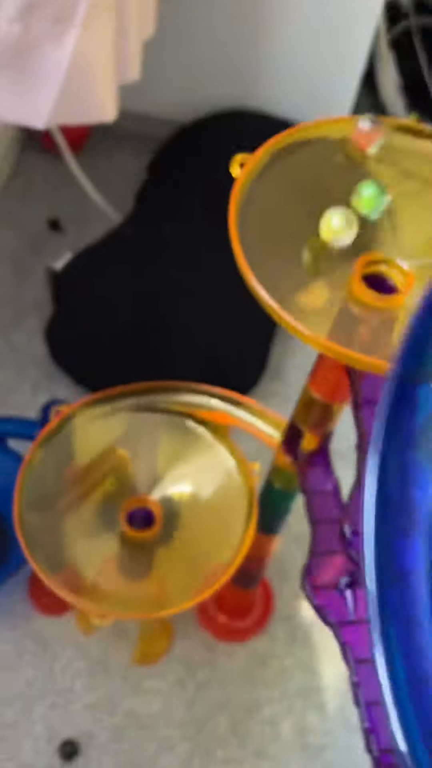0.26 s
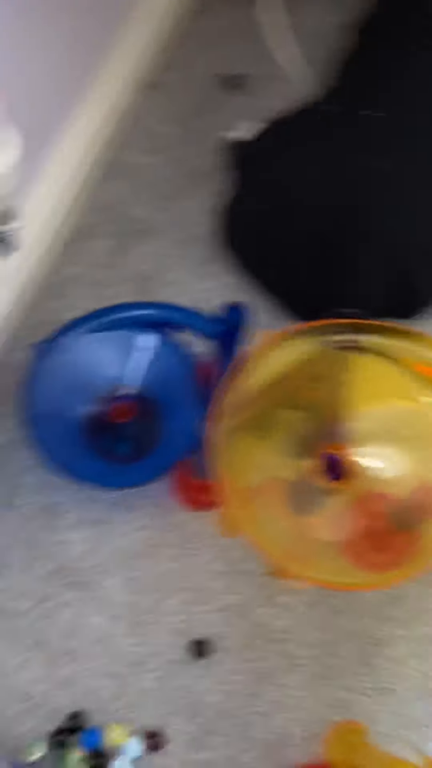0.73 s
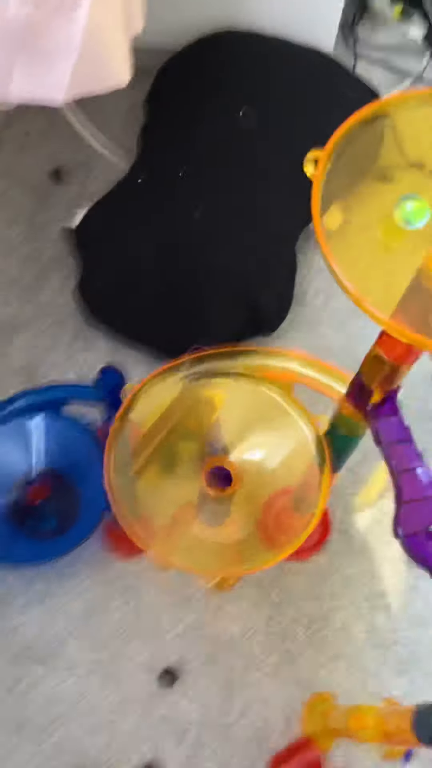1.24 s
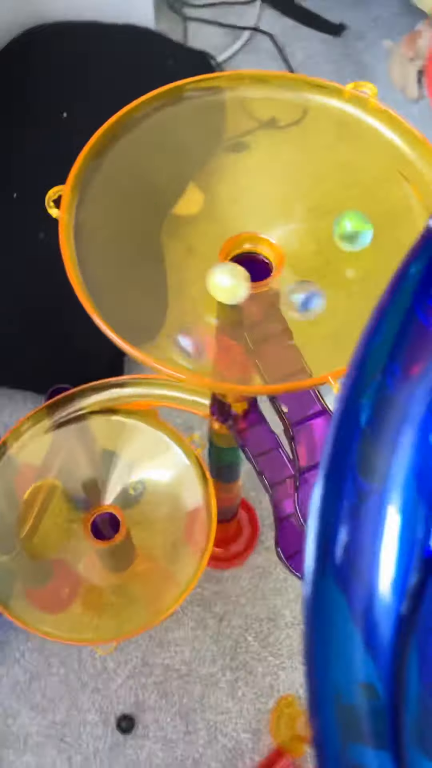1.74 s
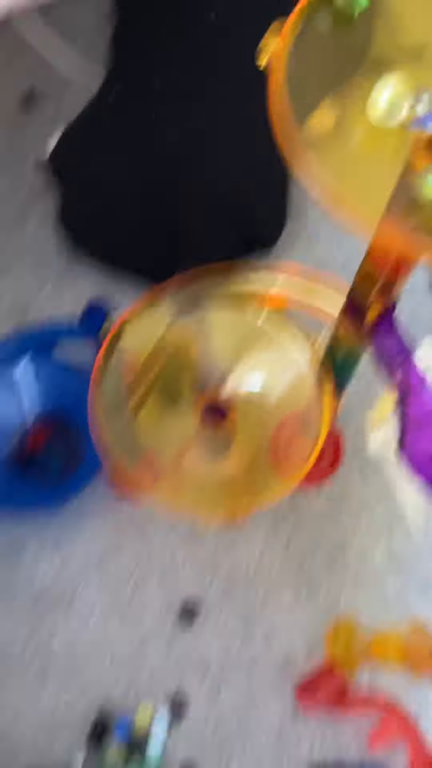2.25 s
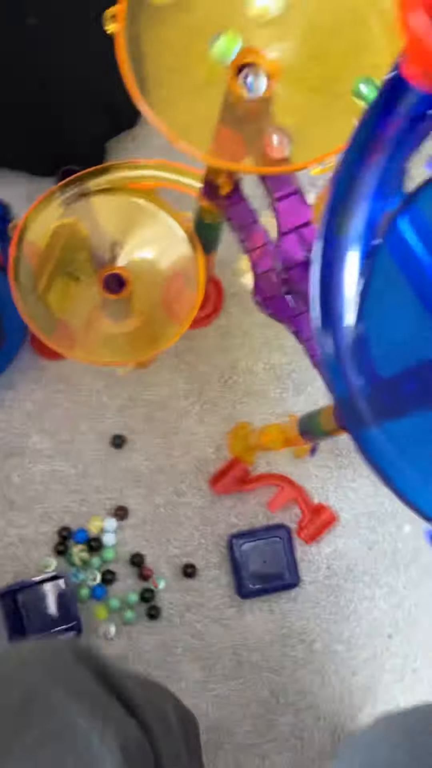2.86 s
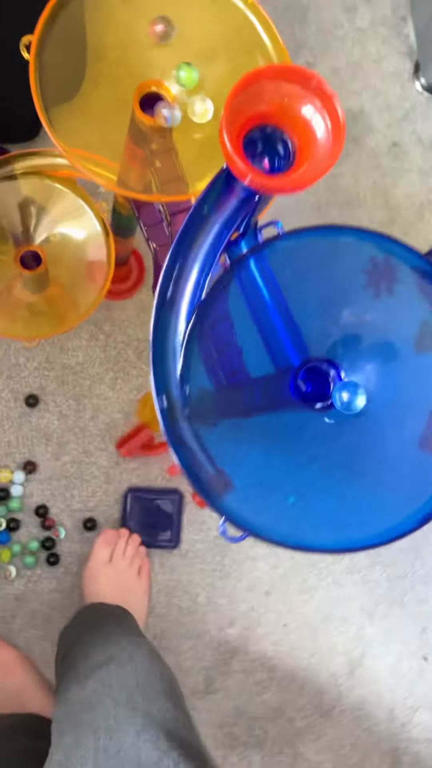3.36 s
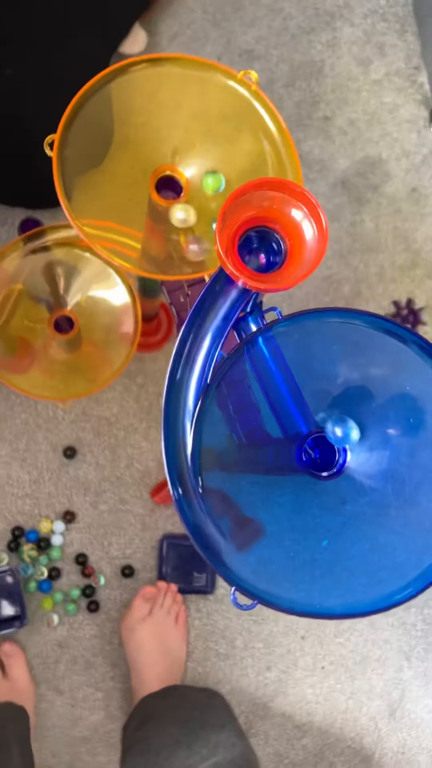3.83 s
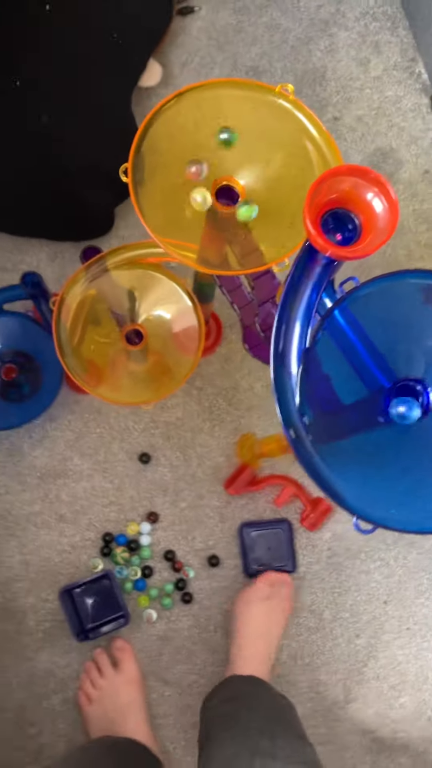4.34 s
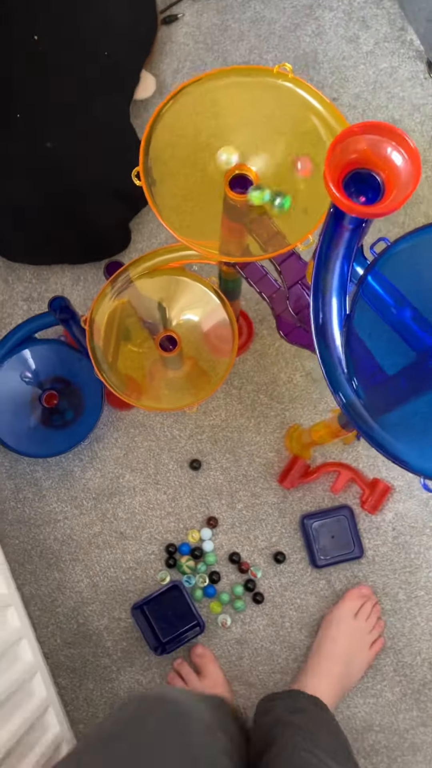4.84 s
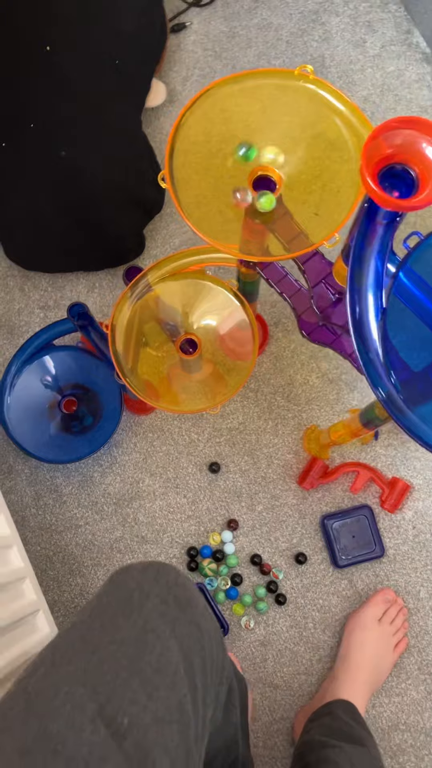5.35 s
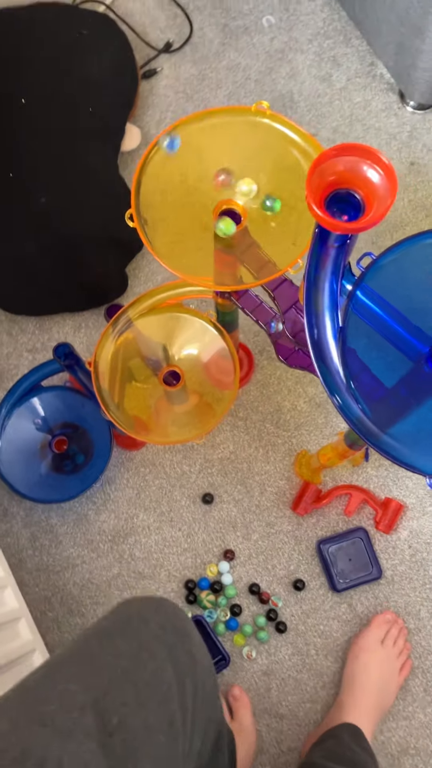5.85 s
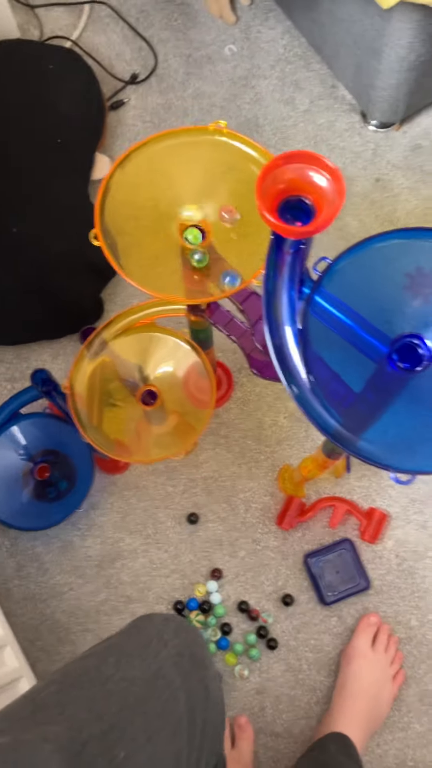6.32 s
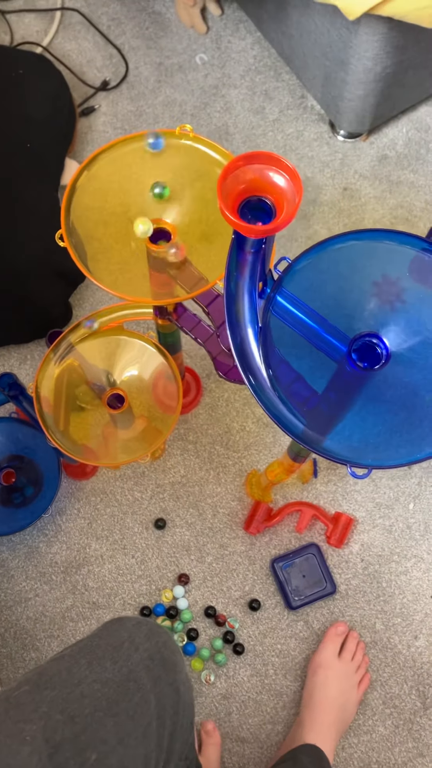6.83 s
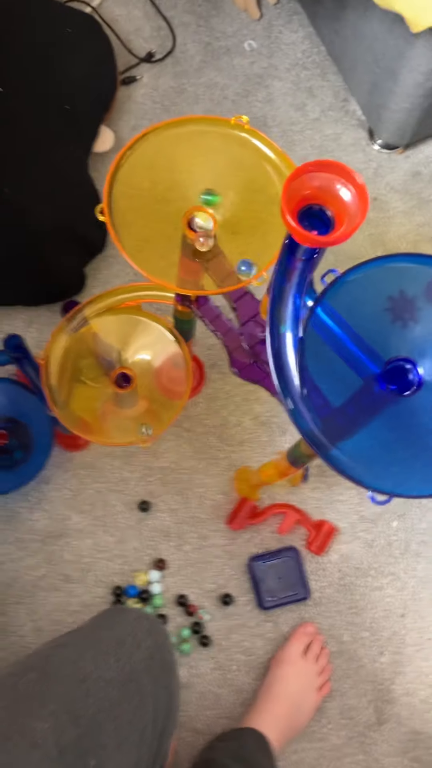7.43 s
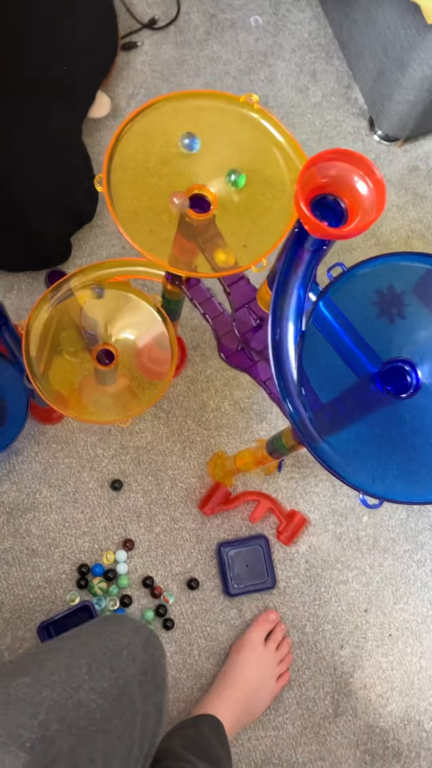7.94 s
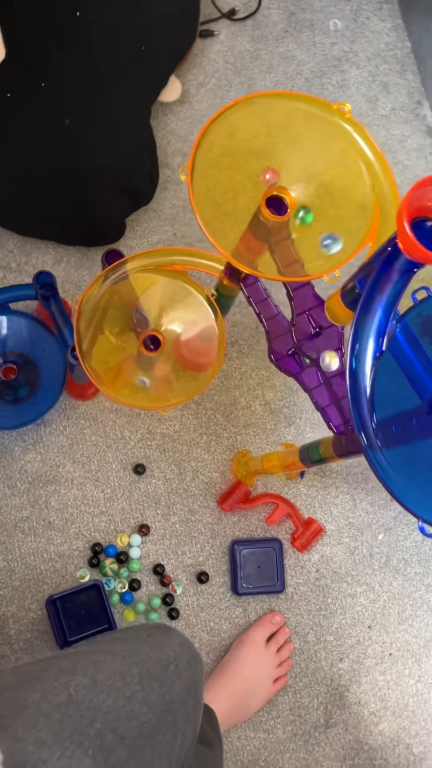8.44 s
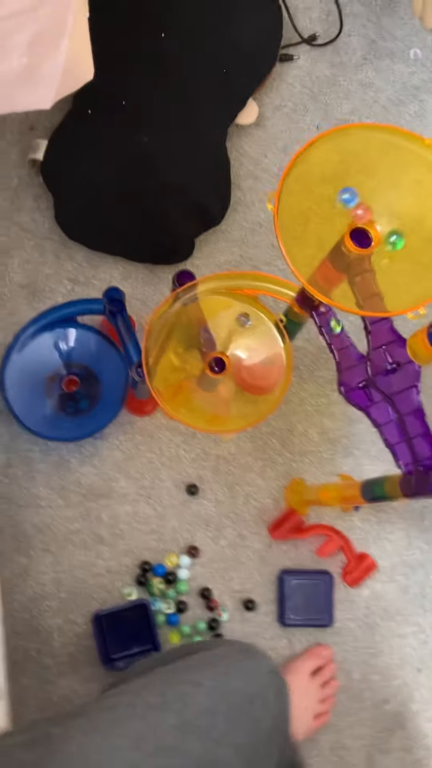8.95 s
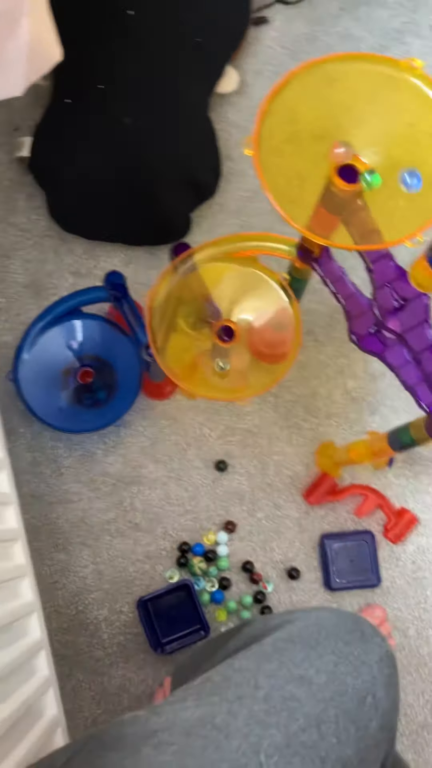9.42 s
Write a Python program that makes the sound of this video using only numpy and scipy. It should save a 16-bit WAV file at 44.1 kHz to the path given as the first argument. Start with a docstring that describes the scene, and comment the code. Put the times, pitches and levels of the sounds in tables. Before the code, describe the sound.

Glass marbles roll and swirl in plastic funnels, then tumble down a plastic run in dense, bright clacking volleys in a small carpeted room.

```python
"""Glass marbles roll and knock in plastic funnels in a small carpeted room; blows ring track modes and crack.
Rolling grit drives the funnel resonances throughout, soft low thumps come now and then, and chutes rattle.
From 3.3 to 5 s a hand-held phone turns to the whole marble run: blows gain weight and edge, the boom fades.
Then marbles drop down the steps in dense volleys of knocks until the end, heard by two microphone ports."""
import sys
import numpy as np
from scipy import signal
from scipy.fft import rfft, irfft
from scipy.io import wavfile
from scipy.ndimage import uniform_filter1d

SR = 44100
rng = np.random.default_rng(int(sys.argv[2]) if len(sys.argv) > 2 else 0)


def generate_wav(sig):
    """Save sig (samples, or channels by samples) to the path in sys.argv[1] as 16-bit PCM at SR."""
    pcm = np.round(np.clip(np.atleast_2d(sig).T, -1, 1) * 32767).astype(np.int16)
    wavfile.write(sys.argv[1], SR, pcm)


def volts(x):
    """Linear amplitude factor 10**(x/20) for a level x in dB, scalar or array-like."""
    e = np.asarray(x, float) / 20
    return 10 ** e


N = 426888  # samples

# Modes of the plastic track. Each row: pitch in Hz, relative level in dB, longest 60 dB decay in seconds.
TRACK = [(253, -21, 0.024), (479, -9, 0.11), (639, -3, 0.053), (822, 1, 0.081), (927, -2.5, 0.095),
         (1075, -6.5, 0.038), (1360, 5, 0.098), (1500, 3.5, 0.037), (1640, 14, 0.012), (1735, 15.5, 0.018),
         (2240, 6.5, 0.021), (2577, 7, 0.022), (2938, 5, 0.029), (3216, 5.5, 0.037), (3810, 4, 0.012),
         (4180, 1.5, 0.024), (4840, 6, 0.0072)]
# Colour of glass on plastic, crack and hiss. Each row: frequency in Hz, relative level in dB.
GLASS = [(300, -25), (2000, -6), (4500, -3), (6000, 5), (8000, 4.5), (11500, 1.5), (15500, -4.5),
         (16500, -59)]
LOW_HZ = 1200  # modes below this are the dry body of the run
UPPER_HZ = 2050  # modes above this follow the brightness of the blow
MODE_HZ = np.array(TRACK)[:, 0]
MAIN_MODES, UPPER_MODES = MODE_HZ < UPPER_HZ, MODE_HZ > UPPER_HZ
KNOCK_LENGTH = 3072  # samples


def colour(x, points):
    """Causal filter through (Hz, dB) points, built from the cepstrum of the log gain."""
    hz, db = np.transpose(points)
    log_hz = np.log(np.fft.rfftfreq(4096, 1 / SR) + 1)
    log_gain = np.interp(log_hz, np.log(hz), db) * np.log(10) / 20
    cepstrum = irfft(log_gain)
    # folding the cepstrum forward makes the filter minimum phase
    cepstrum[1:2048] *= 2
    cepstrum[2049:] = 0
    impulse = irfft(np.exp(rfft(cepstrum)))
    return signal.fftconvolve(x, impulse[None], axes=-1)[:, :x.shape[-1]]


def unit(x):
    """Scale to rms 1."""
    return x / np.sqrt(np.mean(x ** 2))


def walk(rate):
    """Random levels held 1 / rate s and slewed twice; spread near 1."""
    hold = int(SR / rate)
    steps = np.repeat(rng.standard_normal(N // hold + 1), hold)
    return 1.3 * uniform_filter1d(uniform_filter1d(steps, hold), hold)[:N]


def ports(unlike):
    """Noise at both ports, partly shared."""
    shared, own = rng.standard_normal((2, N))
    return shared + unlike * own * np.array([[1], [-1]])


def add(out, s, sound):
    """Mix a two-channel sound in at s seconds."""
    i = int(s * SR)
    n = min(sound.shape[1], N - i)
    out[:, i:i + n] += sound[:, :n]


def turned(s):
    """0 while the phone faces the funnels, 1 once it faces the whole run."""
    return np.interp(s, [3.3, 5], [0, 1])


def knocks(ring_db, rattle_db):
    """The clear blows, light bounces that grow with the rolling, and marbles meeting each other."""
    # Blows on the track. Each row: start in seconds, peak of the main rings in dB,
    # loudest ring in Hz, brightness in dB.
    blows = [(0.389, -21, 1420, -43), (0.4687, -23, 1360, -51), (0.684, -22, 1500, -40),
             (0.9633, -7.5, 1666, -14.5), (1.009, -7.5, 1420, -18.5), (1.047, -9, 1530, -18),
             (1.076, -21, 1640, -70), (1.4055, -15.5, 4840, -13.5), (1.4179, -18, 1660, -25),
             (1.432, -24, 4160, -19.5), (1.4478, -19, 3025, -9), (1.509, -14, 3100, -12.5),
             (1.558, -22, 1360, -55), (1.605, -19, 1360, -47), (1.824, -23.5, 1655, -33),
             (1.918, -21, 1500, -52), (3.1855, -23.5, 1420, -63), (3.505, -17, 1420, -28),
             (3.577, -3.5, 1405, -19), (3.662, -6, 1285, -20), (3.7266, -7.5, 1310, -24.5),
             (3.776, -11.5, 1670, -19), (3.808, -17, 1700, -28), (3.8497, -9, 1880, -25.5),
             (3.8765, -18, 1410, -29.5), (3.931, -10, 1850, -21), (4.0075, -12.5, 1896, -21),
             (4.0662, -11.5, 1735, -20.5), (4.086, -14.5, 1810, -34), (4.116, -10.5, 1296, -20),
             (4.2687, -17.5, 1300, -81), (4.3302, -22, 1790, -28), (4.4391, -7.5, 1750, -21),
             (4.5251, -11.5, 1550, -21.5), (4.6042, -10.5, 1380, -30), (4.677, -4.5, 1695, -17.5),
             (4.7115, -5, 1500, -25), (4.75, -7, 1664, -33), (4.776, -2, 1643, -17.5),
             (4.8704, -5, 1750, -22), (4.9462, -5.5, 1870, -24), (4.9786, -9, 1634, -30),
             (5.022, -12, 1670, -30), (5.052, -13, 1540, -22), (5.0685, -15, 1610, -36),
             (5.0872, -18, 1740, -44), (5.1138, -9.5, 1647, -14), (5.128, -22, 1750, -35),
             (5.1527, -16, 1704, -33), (5.222, -12, 1920, -27), (5.251, -19, 1610, -33),
             (5.3221, -13.5, 1600, -27), (5.4142, -10.5, 1672, -24), (5.4886, -18, 1780, -25.5),
             (5.538, -20.5, 1240, -27.5), (5.66, -18.5, 1294, -23.5), (5.8056, -14.5, 1630, -24.5),
             (5.9243, -15.5, 1900, -24.5), (6.0256, -11.5, 1290, -25), (6.122, -19, 1340, -18.5),
             (6.1913, -15, 1280, -28), (6.203, -15, 1360, -27), (6.221, -14, 1360, -20.5),
             (6.2778, -13, 1340, -17), (6.368, -19, 2250, -26.5), (6.7372, -13.5, 1450, -20.5),
             (6.767, -6.5, 1402, -18), (6.812, -7, 1460, -22), (6.8703, -10.5, 1420, -27.5),
             (6.911, -14, 1440, -31), (6.9408, -15, 1434, -24.5), (7.017, -6, 1750, -36),
             (7.045, -18.5, 1360, -32.5), (7.1057, -12.5, 1250, -25.5), (7.1857, -15, 1500, -21.5),
             (7.2448, -16.5, 1695, -26), (7.2654, -18, 1370, -29), (7.295, -18, 1660, -25),
             (7.3132, -16.5, 1700, -35), (7.436, -16, 1655, -25), (7.5505, -8.5, 1690, -21),
             (7.5626, -3, 1640, -19.5), (7.598, -13, 1640, -29), (7.647, -9.5, 1930, -24),
             (7.683, -12.5, 1720, -32), (7.7127, -16.5, 1750, -36), (7.738, -8, 1750, -26),
             (7.816, -9, 1662, -21), (7.874, -5, 1815, -21), (7.9105, -0.5, 1653, -16),
             (7.931, -12, 1670, -29), (7.96, -11.5, 1590, -24), (7.986, -12.5, 1750, -34),
             (8.025, -14, 1800, -46), (8.037, -13.5, 1940, -23), (8.056, -17, 1750, -28),
             (8.0958, -16, 1730, -24.5), (8.113, -11, 1648, -20.5), (8.1426, -14.5, 1310, -24),
             (8.164, -16.5, 1720, -28), (8.2017, -15, 1573, -25.5), (8.2916, -10.5, 1705, -21),
             (8.359, -20, 1820, -24.5), (8.4138, -21, 1850, -28), (8.4351, -11, 1860, -21),
             (8.564, -16.5, 1650, -21.5), (8.6032, -23, 2500, -27.5), (8.6576, -15, 1230, -25),
             (8.7377, -6.5, 1770, -15.5), (8.7962, -18, 1600, -20), (8.8383, -2, 2020, -16.5),
             (8.8568, -8.5, 1830, -22), (8.9174, -14, 1654, -31), (8.9505, -12.5, 1910, -26.5),
             (8.9881, -13.5, 1750, -37), (9.0449, -15.5, 1880, -19), (9.06, -12.5, 1540, -33),
             (9.1086, -14, 1600, -24), (9.1479, -7, 1900, -13), (9.207, -13, 1750, -23),
             (9.2515, -15.5, 1600, -18), (9.326, -21, 1800, -25), (9.3818, -21.5, 1850, -28)]
    # Marbles clicking together. Each row: start in seconds, peak in dB.
    clicks = [(0.019, -26), (0.598, -14.5), (0.6827, -20.5), (0.7237, -27.5), (0.892, -23), (0.945, -14),
              (1.495, -10), (1.9963, -26), (2.194, -16.5), (2.581, -15.5), (3.39, -21.5), (5.83, -23),
              (6.051, -22), (6.247, -26), (6.793, -14), (7.461, -22), (8.974, -27), (9.0907, -25),
              (9.352, -15.5), (9.398, -28), (9.5482, -17), (9.665, -20.5)]
    out = np.zeros((2, N))
    for s, peak_db, ring_hz, bright_db in blows:
        # the treble crack follows the strength and brightness of the blow, with some scatter
        crack_db = 3 + 0.39 * peak_db + 0.52 * bright_db + 3.5 * rng.standard_normal()
        add(out, s, knock(s, peak_db, ring_hz, bright_db + 8, crack_db))
    for s, peak_db in clicks:
        add(out, s, volts(peak_db) * crack(rng.standard_normal((3, KNOCK_LENGTH))))
    for place, weight, pitch, bright in rng.random((70, 4)):
        i = int(place * N)
        peak_db = ring_db[i] + 5 + 7 * weight
        upper_db = rattle_db[i] + 11 + 8 * weight
        crack_db = rattle_db[i] + 3.5 + 12 * bright
        add(out, i / SR, knock(i / SR, peak_db, 1300 + 600 * pitch, upper_db, crack_db))
    return out


def knock(s, peak_db, ring_hz, upper_db, crack_db):
    """One blow: the modes nearest the struck step's own pitch ring loudest."""
    t = np.arange(KNOCK_LENGTH) / SR
    spot, side, tune = rng.standard_normal((3, len(MODE_HZ)))
    grit = rng.standard_normal((3, KNOCK_LENGTH))
    funnel_side = 1 - turned(s)
    near_db = np.where(MODE_HZ > UPPER_HZ, 16, 10) * np.exp(-(np.log(MODE_HZ / ring_hz) / 0.06) ** 2)
    thud_db = (MODE_HZ < LOW_HZ / 2) * funnel_side * -9
    mode_db = near_db + thud_db + 2.1 * spot
    gain_db = (mode_db[:, None] + np.outer(side, [1.6, -1.6]))[:, :, None]  # mode, port, time
    # the marble chatters on the plastic, so a sharp first contact is followed by a ragged burst and a weak drag
    contact = (np.exp(-t / 0.0031) + 0.11 * np.exp(-t / 0.026)) * (1 - np.exp(-t / 0.00076))
    push = (grit[0] + 0.41 * grit[1:]) * contact
    push[:, 8] += 14
    # the marble lands again, weaker, about 17 ms later
    rebound = int(0.017 * SR * volts(3 * grit[1, -1]))
    push = push + 0.15 * np.roll(push, rebound, axis=1)
    main = ring(push, MAIN_MODES, gain_db[MAIN_MODES], 0.017 * tune[MAIN_MODES])
    upper = ring(push, UPPER_MODES, gain_db[UPPER_MODES], 0.017 * tune[UPPER_MODES])
    return (volts(peak_db) * main / np.abs(main).max()
            + volts(upper_db) * upper / np.abs(upper).max()
            + volts(crack_db - 3 * funnel_side) * crack(grit))


def ring(push, part, gain_db, detune):
    """The chosen track modes driven by a force; a small plastic part radiates no deep bass."""
    out = 0
    # neighbouring modes swing in opposite sense, so little is left outside their range
    for k, ((hz, db, t60), extra_db, shift) in enumerate(zip(np.array(TRACK)[part], gain_db, detune)):
        # joined plastic parts damp each other, which caps the decay in seconds
        longest = 0.04 if LOW_HZ <= hz < UPPER_HZ else 0.022
        pole = volts(-60 / min(t60, longest) / SR)
        turn = 2 * np.pi * hz * (1 + shift) / SR
        mode = signal.lfilter([np.sin(turn)], [1, -2 * pole * np.cos(turn), pole ** 2], push)
        out = out + (-1) ** k * volts(db + extra_db) * mode
    return signal.sosfilt(signal.butter(2, 200, "high", fs=SR, output="sos"), out)


def crack(grit):
    """The few milliseconds of treble when glass strikes, peak 1."""
    t = np.arange(grit.shape[1]) / SR
    contact = (np.exp(-t / 0.0023) + 0.0064 * np.exp(-t / 0.019)) * (1 - np.exp(-t / 0.0015))
    force = (grit[0] + 0.26 * grit[1:]) * contact
    force[:, 20] += 2.5  # the first hard contact
    x = colour(force, GLASS)
    return x / np.abs(x).max()


def rattles():
    """A marble skids along a chute: dense tiny bounces ring the track and hiss; low hollow resonances swell."""
    # Rattles along a chute. Each row: start in seconds, end in seconds, level of the main rings in dB.
    skids = [(0.84, 1.05, -39), (3.461, 3.591, -33), (3.923, 4.18, -43), (4.568, 4.797, -30.5),
             (5.042, 5.095, -22.5), (5.089, 5.199, -33.5), (6.18, 6.45, -42.5), (6.645, 6.823, -36.5),
             (7.23, 7.35, -40), (7.375, 7.627, -39.5), (7.85, 8.217, -40.5), (8.938, 9.33, -42.5)]
    # Low hollow resonances: a funnel or cup resounding under the knocks, later a hollow rumble.
    # Each row: start in seconds, end in seconds, level at full swell in dB, resonance in Hz.
    hollows = [(0.907, 1.067, -33, 600), (6.19, 6.36, -36, 500)]
    t = np.arange(N) / SR
    push = unit(ports(0.5) * volts(5.5 * walk(600) + 3 * walk(90)))
    flat = np.zeros(len(MODE_HZ))
    main, upper = (unit(ring(push, part, flat[part], flat[part])) for part in (MAIN_MODES, UPPER_MODES))
    hiss = unit(colour(push, GLASS))
    skid = main + volts(1.5) * upper + volts(-10.5) * hiss
    out = 0
    for start, end, db, hollow_hz in hollows:
        b, a = signal.iirpeak(hollow_hz, 1.1, SR)
        grit = ports(0.21) * volts(4 * walk(90))
        resonance = unit(signal.lfilter(b, a, signal.lfilter(b, a, grit)))
        swell = np.sin(np.pi * np.clip((t - start) / (end - start), 0, 1))
        out = out + volts(db) * resonance * swell
    for start, end, db in skids:
        swell = np.clip((t - start) / 0.037, 0, 1) * np.clip((end - t) / 0.036, 0, 1)
        out = out + swell * volts(db) * skid
    return out


def rolling(body_db, ring_db, rattle_db):
    """Surface grit under the marbles drives the funnels; each resonance swells as marbles orbit."""
    # Funnel resonances. Each row: centre in Hz, nominal width in Hz, relative level in dB.
    funnel = [(639, 158, 3), (1028, 123, -10.5), (1420, 426, -2.5), (1750, 410, -8), (2140, 430, -1.5),
              (2600, 880, -9), (3940, 890, -4.5)]
    grit = volts(2.6 * walk(300) + 1.1 * walk(40))
    drive = unit(ports(0.47) * grit)
    orbit = walk(9.3)
    out = 0
    for hz, width, db in funnel:
        # marbles riding in a funnel blur its resonances, so the Q stays at 6 or below
        b, a = signal.iirpeak(hz, min(hz / width, 6), SR)
        part_db = body_db if hz < 800 else ring_db if hz < UPPER_HZ else rattle_db
        swell_db = 1.1 * orbit + 1.7 * walk(16)
        resonance = unit(signal.lfilter(b, a, signal.lfilter(b, a, drive)))
        out = out + volts(part_db + db + swell_db) * resonance
    # the rolling hiss is duller than the crack, weakest at the top
    duller = [(9500, -14.0), (11500, -17), (16000, -20)]
    hiss = unit(colour(colour(ports(0.017) * grit, GLASS), duller))
    return out + hiss * volts(0.7 * rattle_db - 22.0 + 5.1 * walk(60))


def thumps():
    """Soft low bumps of hand and feet through the phone's body over wavering room air."""
    # Thumps. Each row: start in seconds, nominal level in dB, pitch it settles to in Hz.
    bumps = [(0.745, -39.5, 55.4), (2.16, -40.5, 60.5), (2.614, -38, 61.3), (8.408, -46, 109)]
    # Colour of the room air. Each row: frequency in Hz, relative level in dB.
    air = [(20, -25), (35, 10), (60, 15), (120, 13.5), (260, 13.5), (430, 12), (900, -86)]
    # The air and the hand on the phone stir more or less. Each row: time in seconds, mid level in dB.
    stir = [(0.1, -52), (0.4, -60), (2.7, -57), (3.1, -65.5), (4.9, -58.5), (6.6, -58.5), (8.4, -56),
            (9.68, -56.5)]
    stir_db = np.interp(np.arange(N) / SR, *np.transpose(stir))
    out = unit(colour(ports(0.33), air)) * volts(stir_db + 3 * walk(7.7))
    t = np.arange(8192) / SR
    for s, level_db, hz in bumps:
        # each bump sags in pitch and reaches the right port out of step
        turn = 2 * np.pi * hz * (t + 0.018 * (1 - np.exp(-t / 0.005))) - np.array([[0], [1.2]])
        swell = t / 0.015 * np.exp(1 - t / 0.017)
        add(out, s, volts(level_db) * np.array([[1.2], [.8]]) * np.sin(turn) * swell)
    return out


def room(x):
    """Short carpeted room: a decaying scatter of echoes, partly different at each port."""
    t = np.arange(12000) / SR
    echoes = ports(0.64)[:, :len(t)] * volts(-60 * t / 0.12) * (t > .004)
    echoes = colour(echoes, [(200, 0.0), (2500, -5.0), (12000, -10.0)])
    return x + volts(-29.0) * signal.fftconvolve(echoes, x.mean(0)[None], axes=-1)[:, :N]


def scene():
    """Marbles in the room, plus the thumps and air."""
    # Rolling of the marbles. Each row: time in seconds, level in dB that all the rolling layers follow.
    roll = [(0.0, -35), (0.62, -37), (1.7, -37.5), (1.93, -33), (2.05, -36.5), (2.3, -34), (2.36, -39.5),
            (2.82, -38.5), (2.92, -34.5), (3.02, -40), (3.4, -39), (4.37, -36.5), (4.69, -39), (5.39, -37),
            (6.71, -37.5), (7.9, -36), (8.46, -36.5), (8.95, -35.5), (9.68, -39)]
    t = np.arange(N) / SR
    ring_db = np.interp(t, *np.transpose(roll))
    body_db = ring_db - 13 - 3 * turned(t)  # the funnels' boom fades as the phone turns
    rattle_db = ring_db - 14
    marbles = knocks(ring_db, rattle_db) + rattles() + rolling(body_db, ring_db, rattle_db)
    return room(marbles) + thumps()


def low_pass(x):
    """Removes everything above the highest recorded frequency."""
    return signal.sosfilt(signal.butter(12, 16840, fs=SR, output="sos"), x)


def record(dry):
    """The right port hears later and is a little stronger in the middle range; the loudest peaks are rounded."""
    # Phase by which the right port hears later. Each row: frequency in Hz, lag in radians.
    port_lag = [(0, 0), (1900, 0.54), (5300, 3), (8000, 5.5), (11100, 9), (12900, 10), (16500, 14.5)]
    hz = np.fft.rfftfreq(N, 1 / SR)
    lean = volts(np.interp(np.log(hz + 1), np.log([60, 1200, 8000]), [-.8, 1.2, -.1]))
    lag = np.exp(-1j * np.interp(hz, *np.transpose(port_lag)))
    left = irfft(rfft(dry[0]) / lean, N)
    right = irfft(rfft(dry[1]) * lean * lag, N)
    mix = np.tanh(np.array([left, right]))
    return low_pass(mix)


dry = scene()
out = record(dry)
generate_wav(out)
```